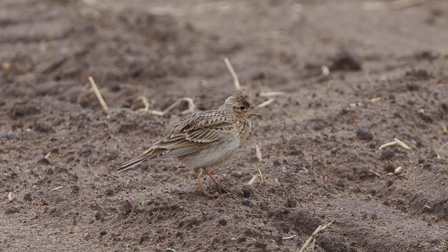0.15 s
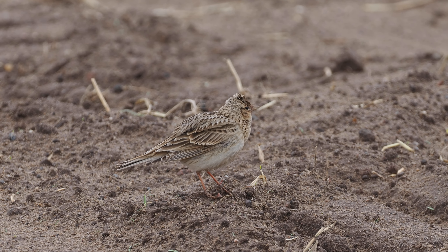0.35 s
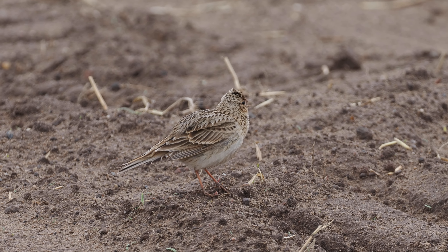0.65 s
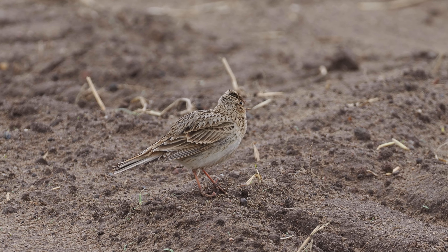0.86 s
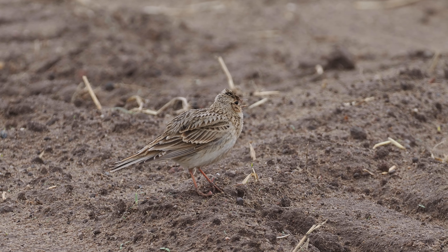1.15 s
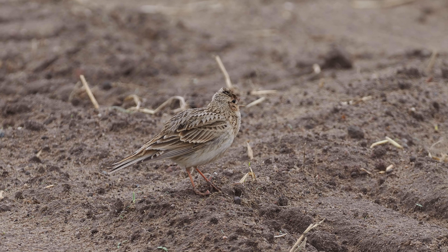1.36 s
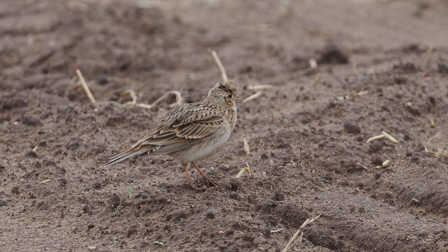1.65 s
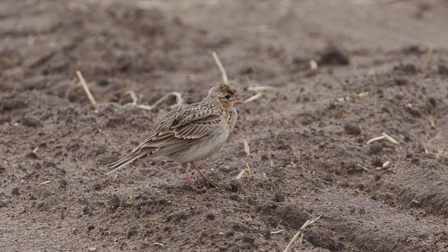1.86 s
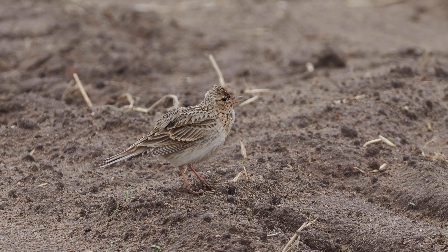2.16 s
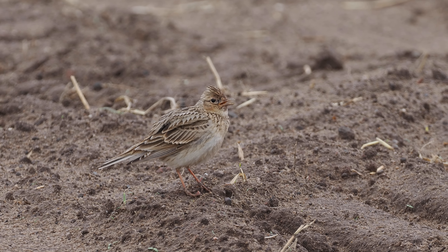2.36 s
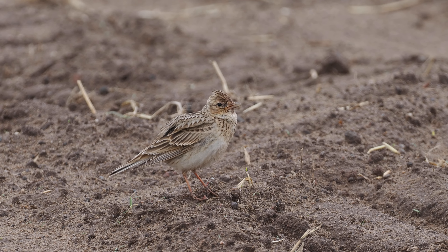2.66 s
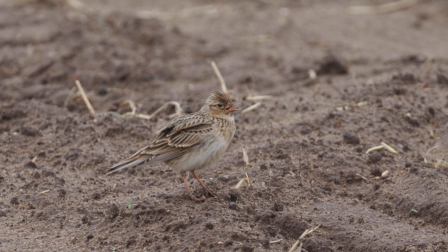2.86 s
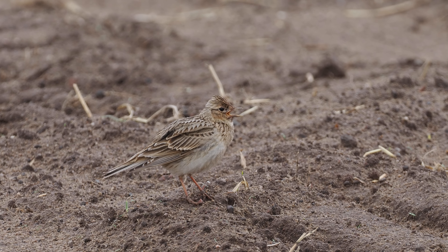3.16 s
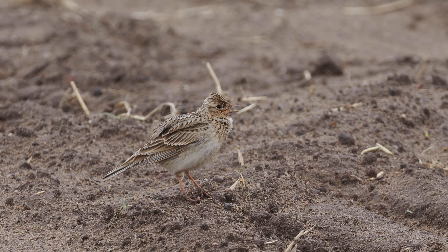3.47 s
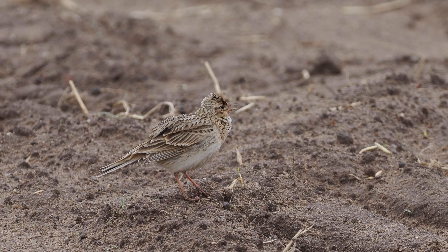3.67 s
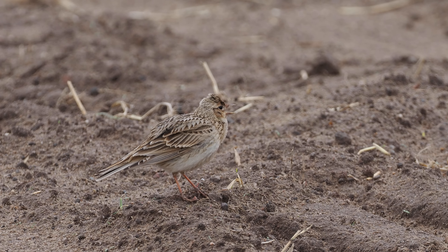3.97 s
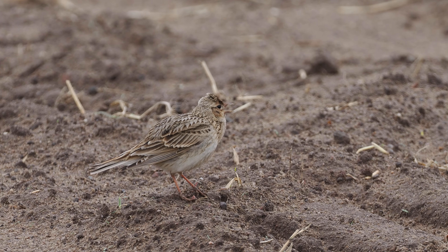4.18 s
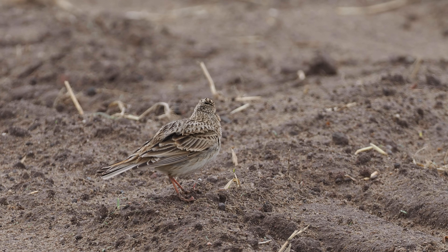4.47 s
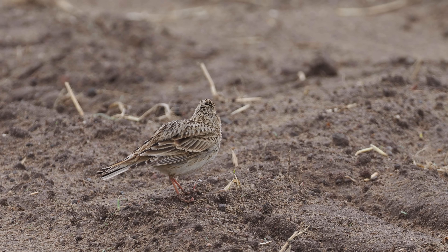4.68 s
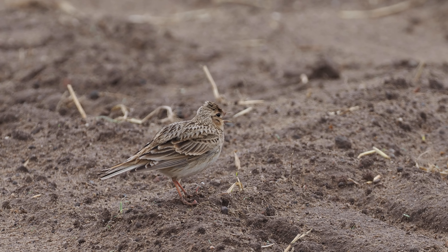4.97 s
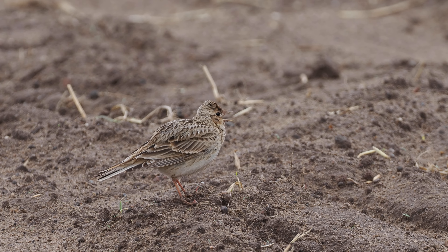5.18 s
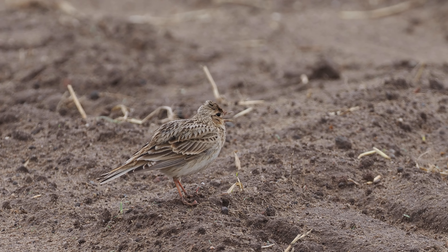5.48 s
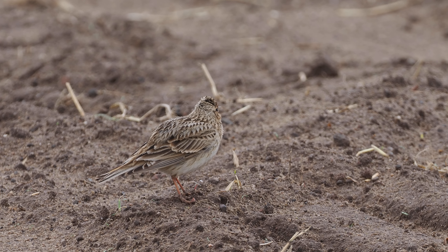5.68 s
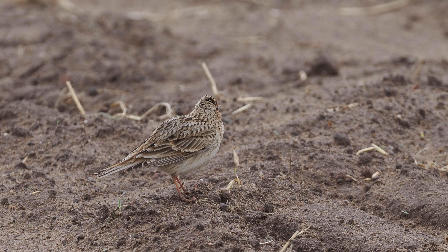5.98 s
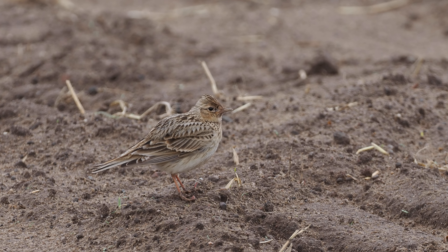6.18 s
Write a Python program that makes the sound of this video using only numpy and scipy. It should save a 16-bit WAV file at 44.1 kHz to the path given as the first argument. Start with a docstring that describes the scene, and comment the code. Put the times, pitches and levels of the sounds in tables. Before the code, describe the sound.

A skylark sings a fast run of trills, whistles and buzzes close by, with gusty wind rumbling on the microphone.

```python
"""A skylark close by opens with a falling whistle, sweeps, a rattle and a stutter. Twitters, creaking
chews and buzzes follow, then slurs, trills, a wobble and rising whistles; a run of pips ends the song.
Each syllable is a gliding tone of the syrinx, most of them frequency-modulated by a repeated gesture,
and filtered by throat and beak. Throughout, bare soil scatters the song, and wind rumbles and buffets
the microphone over the far hum of open country."""
import sys
import numpy as np
from scipy import signal
from scipy.fft import rfft, irfft, next_fast_len
from scipy.io import wavfile
from scipy.ndimage import uniform_filter1d

SR = 44100
rng = np.random.default_rng(int(sys.argv[2]) if len(sys.argv) > 2 else 0)


def log_audio(samples):
    """Write samples as a 16-bit WAV file to the path given in sys.argv[1]."""
    # one column per channel
    frames = np.atleast_2d(samples).T
    # limit to full scale, then quantise
    limited = np.clip(frames, -1, 1)
    pcm = np.round(limited * 32767).astype(np.int16)
    wavfile.write(sys.argv[1], SR, pcm)


N = 279148


def skylark():
    """Superposition: the song is the sum of its syllables, each delayed to its onset."""
    song = [(0, falling_whistle()), (.464, sweeps()), (.7188, rattle()), (.844, stutter())]
    for syllable, rows in [(chew, CHEWS), (buzz, BUZZES), (twitter, TWITTERS),
                           (tick, TICKS), (tsip, TSIPS), (pip, PIPS)]:
        song += [(s, syllable(*row)) for s, *row in rows]
    for s, slur_s, trill_s, slur_db, trill_hz, trill_db in SLURS:
        song += [(s, slur(slur_s, slur_db)), (s + slur_s, trill(trill_s, trill_hz, trill_db))]
    song += [(s, pip(hz, 0, db, length=.014)) for s, hz, db in LEAD_NOTES]
    song += [(4.249, wobble())]
    song += [(rows[0][0], rising_whistle(rows)) for rows in (LOW_WHISTLE, HIGH_WHISTLE)]
    out = np.zeros(N)
    for s, sound in song:
        add(out, s, sound)
    return out


# Response of throat and beak: (frequency [Hz], gain [dB])
THROAT = [(1800, -12), (3000, -4), (3700, -8), (4300, -3.5), (4800, -2), (5400, 0.5), (6000, -15),
          (6600, -12.5), (7800, 0), (8500, -24), (15000, -17.5)]


def voice(hz, effort_db, jitter, second_db, nasal_db=-46, air_db=-50, third_db=-25, upper_db=-6):
    """Source and filter: the throat shapes tone and breath, turning pitch swings into throbs of level."""
    hz = hz * (1 + jitter * drift(len(hz), 640))
    phase = 2 * np.pi * np.cumsum(hz) / SR
    partials = [(1, 0), (2, second_db), (3, third_db)]
    # a nasal note also vibrates at half the pitch, filling the gaps between harmonics
    partials += [(.5, nasal_db), (1.5, nasal_db + upper_db), (2.5, nasal_db + upper_db)]
    tone = sum(amp(db) * (k * hz < SR / 2) * np.sin(k * phase) for k, db in partials)
    breath = signal.lfilter(*signal.butter(2, 5000, "high", fs=SR), rng.standard_normal(len(hz)))
    fade = signal.windows.tukey(len(hz), min(.004 * SR / len(hz), 1))
    source = np.sqrt(2) * (tone + amp(air_db) * breath) * fade * amp(effort_db)
    source = np.pad(source, (0, SR // 50))
    size = next_fast_len(2 * len(source))
    throat = amp(spectrum_at(THROAT, np.fft.rfftfreq(size, 1 / SR)))
    return irfft(rfft(source, size) * throat, size)[:len(source)]


def warble(gesture, hz, effort_db, swing_hz, rate_hz, air_db=-28, rasp_hz=180, second_db=-20,
           grain_db=4, clean_hz=4300, uneven=.034, throb=1, jitter=.014):
    """Frequency and amplitude modulation: a gesture of the syrinx repeats, never twice quite alike."""
    cycles = np.cumsum(rate_hz * (1 + uneven * drift(len(hz), 150))) / SR
    phase, *columns = np.transpose(gesture)
    bend, pulse_db = (uniform_filter1d(np.interp(cycles, phase, c, period=1), size=24) for c in columns)
    hz = hz + swing_hz * bend
    # at low pitch the slack membrane flutters: the tone rasps and loses its overtone
    slack = np.clip((clean_hz - hz) / 1000, 0, 1)
    hz = hz + slack * rasp_hz * drift(len(hz), 1110)
    pulse_db = throb * pulse_db + slack * grain_db * np.tanh(drift(len(hz), 670))
    return voice(hz, effort_db + pulse_db, jitter, second_db - 7 * slack ** 2, air_db=air_db)


def whistle(hz, effort_db, second_db=-25):
    """Nearly sinusoidal vibration gives a clean tone."""
    return voice(hz, effort_db, jitter=.002, second_db=second_db)


def falling_whistle(length=.34, sag_hz_per_s=2050, db=-20, fade_db_per_s=58):
    """Exponential decay: the note dies away as its pitch eases off the top and sags."""
    t, u = clock(length)
    hz = shift(t, 4990, 4480, at_s=.052, over_s=.043) - sag_hz_per_s * t
    return whistle(hz, db - fade_db_per_s * t + release(t))


# Downsweep gesture: (phase [cycles], bend [swings], level [dB])
SWEEP = [(0, 1.1, -12), (.13, .7, 1), (.42, 0, 0), (.65, -.4, -7), (.88, -1.3, -20)]


def sweeps(length=.22, hz=5230, sink_hz=600, swing_hz=1300, narrow_hz=660, db=-25):
    """Sawtooth modulation: steep downsweeps settle in pace while they sink, narrow and swell."""
    t, u = clock(length)
    effort_db = db + swell(u, crest=.75, rise_db=10, fade_db=7.5)
    rate_hz = 43.3 + 15 * np.exp(-t / .035)
    return warble(SWEEP, hz - sink_hz * u, effort_db, swing_hz - narrow_hz * u, rate_hz,
                  air_db=-19, second_db=-14)


# Flick gesture: (phase [cycles], bend [swings], level [dB])
FLICK = [(0, 1, -12), (.1, .3, 0), (.24, -.8, -3), (.6, -1, -4), (.88, -1, -22)]


def rattle(length=.076, hz=4550, swing_hz=1300, rate_hz=79, db=-31):
    """Wide modulation of a steady carrier is heard as dry flicks."""
    t, u = clock(length)
    effort_db = db + swell(u, crest=.82, rise_db=5, fade_db=5)
    return warble(FLICK, np.full_like(t, hz), effort_db, swing_hz, rate_hz, air_db=-11)


# Notch gesture: (phase [cycles], bend [swings], level [dB])
NOTCH = [(0, -.9, -24), (.09, .7, 0), (.24, .2, 1), (.76, -.1, 0), (.92, -1, -6)]


def stutter(length=.22, db=-25.5, swing_hz=560, narrow_hz=420, sag_hz_per_s=1350, fade_db_per_s=85):
    """Waning modulation: the notches in a falling whistle halve in rate and smooth out."""
    t, u = clock(length)
    hz = shift(t, 6000, 4360, at_s=.077, over_s=.05) - sag_hz_per_s * t
    rate_hz = shift(t, 117, 58, at_s=.047, over_s=.012)
    effort_db = db + swell(u, crest=.33, rise_db=3, fade_db=-1.5) + release(t)
    effort_db -= fade_db_per_s * np.maximum(t - .085, 0)
    return warble(NOTCH, hz, effort_db, swing_hz - narrow_hz * u, rate_hz,
                  rasp_hz=40, throb=1 - u ** 3, jitter=.005)


# Notes of a twitter: (nominal onset [s], duration [s], nominal pitch [Hz], scoop [Hz], effort [dB])
NASAL_NOTES = [(0, 0.0067, 5410, 1519, -27.5), (.01, 0.0074, 7340, 2509, -27.5),
               (0.019, 0.0081, 6880, 2504, -32), (0.028, 0.018, 6570, 1691, -36),
               (.045, .015, 5800, 900, -29.5), (.063, 0.019, 4990, 300, -27.5),
               (0.086, 0.015, 4310, 0, -33)]
# Twitters: (time [s], onset spacing [ratio], pitch [ratio], added effort [dB])
TWITTERS = [(1.107, 0.94, 1.054, -4), (3.076, 0.94, 1.014, 0.5), (3.207, 0.99, 0.975, 2),
            (3.342, 0.9, 1.03, 2)]


def twitter(stretch, pitch, effort_db, scoop_s=.0025, sag=.055, break_hz=5300, break_db_per_hz=.0025):
    """Period doubling: quick notes scoop up and sag, the highest breaking most into the octave below."""
    out = np.zeros(SR // 2)
    for s, length, hz, scoop_hz, db in NASAL_NOTES:
        t, u = clock(length)
        glide = pitch * hz * (1 - sag * u ** 2) - scoop_hz * np.exp(-(t / scoop_s) ** 2)
        breaking_db = break_db_per_hz * max(hz - break_hz, 0)
        note_db = db + effort_db - breaking_db / 2 + swell(u, crest=.35, rise_db=4, fade_db=11)
        note = voice(glide, note_db, jitter=.022, second_db=-21, nasal_db=breaking_db - 7.5,
                     air_db=-20, upper_db=-11)
        add(out, s * stretch, note)
    return out


# Gestures of a chew's head and tail: (phase [cycles], bend [swings], level [dB])
HOOK = [(0, -1, -22), (.17, -.2, -1), (.37, .15, 2), (.56, .3, -20), (.72, .8, -11), (.86, -.1, -7)]
CREAK = [(0, .7, -5), (.07, .1, 4), (.18, -.6, -3), (.3, -1.1, -8), (.43, -.45, 4), (.54, .2, 2),
         (.66, .6, -7), (.86, .7, -22)]
# Chews: (time [s], duration [s], head effort [dB], tail effort [dB], final pitch [Hz])
CHEWS = [(1.246, 0.12, -29.5, -36, 2910), (1.397, 0.12, -29.5, -33, 2716), (1.558, 0.13, -27, -32.5, 2686),
         (1.719, 0.12, -24.5, -31, 2760), (1.887, 0.14, -20, -31, 2574), (2.07, 0.14, -25.5, -31.5, 2676),
         (2.767, .11, -13.5, -31.5, 2630), (2.913, 0.13, -18.5, -32, 2710), (3.478, 0.13, -20, -30, 2670),
         (3.64, 0.12, -21.5, -31.5, 2694)]


def chew(length, head_db, tail_db, end_hz, head_s=.032, head_hz=4400, drop_hz=1450, sag_hz=220):
    """Exponential relaxation: after three high hooks, pitch and pace drop into a creaking tail."""
    out = np.zeros(SR // 4)
    t, u = clock(head_s)
    effort_db = head_db + swell(u, crest=.6, rise_db=8, fade_db=4)
    add(out, 0, warble(HOOK, np.full_like(t, head_hz), effort_db, swing_hz=680, rate_hz=88))
    t, u = clock(length - head_s)
    dropping = np.exp(-t / .015)
    hz = end_hz + sag_hz * (1 - u) + drop_hz * dropping
    carried_db = .27 * (head_db - tail_db) * dropping
    effort_db = tail_db + carried_db + swell(u, crest=.65, rise_db=2, fade_db=4)
    add(out, head_s, warble(CREAK, hz, effort_db, swing_hz=580, rate_hz=53 + 14 * dropping))
    return out


# Flutter gesture of buzz and slur: (phase [cycles], bend [swings], level [dB])
FLUTTER = [(0, -1.25, -6), (.22, .5, -7), (.48, .9, 0), (.76, .3, 4)]
# Buzzes: (time [s], top pitch [Hz], effort [dB]) with the duration [s] after the time
BUZZES = [(2.245, 0.12, 4920, -17.5), (2.4177, 0.13, 4917, -17.5), (2.591, 0.1277, 4900, -16.5)]


def buzz(length, top_hz, db, end_hz=2270, scoop_hz=330, rate_hz=305, slowing_hz=85, soften_db=12.5):
    """Sidebands of fast modulation make a hoarse note; it slides down an octave, slowing and softening."""
    t, u = clock(length)
    hz = shift(t, top_hz, end_hz, at_s=.066, over_s=.036) - scoop_hz * np.exp(-t / .0087)
    effort_db = db + swell(u, crest=.16, rise_db=16, fade_db=3)
    effort_db -= shift(t, 0, soften_db, at_s=.063, over_s=.013)
    swing_hz = shift(t, 470, 260, at_s=.0832, over_s=.029)
    return warble(FLUTTER, hz, effort_db, swing_hz, rate_hz - slowing_hz * u ** 1.5)


# Slurs running into trills: (time [s], slur duration [s], trill duration [s], slur effort [dB],
# trill pitch [Hz], trill effort [dB])
SLURS = [(3.822, 0.041, 0.061, -20.5, 4695, -23), (4.837, 0.082, 0.062, -20, 4440, -30),
         (5.157, 0.072, 0.07, -17, 4630, -25.5)]


def slur(length, db, top_hz=6400, end_hz=3350, sag_hz=400, swing_hz=260, rate_hz=200):
    """Irregular modulation: a high note quivers, then steadies as it plunges."""
    t, u = clock(length)
    hz = shift(t, top_hz, end_hz, at_s=.86 * length, over_s=.14 * length) - sag_hz * u
    quiver = shift(t, 1, 0, at_s=.6 * length, over_s=.12 * length)
    effort_db = db + swell(u, crest=.74, rise_db=15, fade_db=36.5)
    return warble(FLUTTER, hz, effort_db, swing_hz * quiver, rate_hz, uneven=.15, throb=quiver)


# Zigzag gesture: (phase [cycles], bend [swings], level [dB])
ZIGZAG = [(.03, -.92, -5), (.16, -.85, -7), (.3, .05, 2), (.5, 1.05, -8), (.62, .6, -1), (.72, -.05, 2),
          (.87, -.85, -6)]


def trill(length, hz, db, swing_hz=1260, rate_hz=90):
    """Triangular modulation: the level peaks twice a cycle, as the pitch rises and as it falls."""
    t, u = clock(length)
    effort_db = db + swell(u, crest=.58, rise_db=5, fade_db=16)
    return warble(ZIGZAG, np.full_like(t, hz), effort_db, swing_hz, rate_hz, air_db=-15)


# Two runs of pips: (time [s], pitch [Hz], sag [Hz], effort [dB])
PIPS = [(3.951, 4836, 560, -19.5), (3.997, 4856, 200, -21.5), (4.042, 4820, 232, -20),
        (4.086, 4800, 172, -21.5), (4.129, 4740, 129, -23.5), (5.333, 4690, 423, -31),
        (5.376, 4736, 290, -26), (5.42, 4720, 160, -24), (5.465, 4766, 110, -23.5),
        (5.512, 4802, 120, -22.5), (5.558, 4690, 190, -28), (5.604, 4610, 170, -32.5)]
# Two short pips before the wobble: (time [s], pitch [Hz], effort [dB])
LEAD_NOTES = [(4.223, 4580, -27), (4.238, 3220, -27.5)]


def pip(hz, sag_hz, db, length=.036, arch_hz=620, roundness=.77, cut_s_per_hz=1.2e-5):
    """A rounded tone burst of arching pitch; the more it sags, the sooner it ends."""
    t, u = clock(length - cut_s_per_hz * sag_hz)
    effort_db = db + roundness * 20 * np.log10(np.sin(np.pi * u) + 1e-3)
    return whistle(hz + sag_hz * (.5 - u) - arch_hz * (.5 - u) ** 2, effort_db, second_db=-15)


# Gesture of an arch and a low scoop: (phase [cycles], bend [swings], level [dB])
LOOP = [(0, -.6, -6), (.12, .3, 1), (.28, .95, -4), (.38, .7, -1), (.46, -.2, 4), (.54, -1.3, -22),
        (.65, -.8, 0), (.78, -.55, 2), (.92, -.7, -5)]


def wobble(length=.22, end_hz=3130, excess_hz=560, relax_s=.11, db=-36, push_db=3):
    """Relaxing tension: slow arches lose pitch, width, pace and effort together."""
    t, u = clock(length)
    tension = np.exp(-t / relax_s)
    hz = end_hz + excess_hz * tension
    effort_db = db + push_db * tension + release(t)
    swing_hz = 540 + 300 * tension
    rate_hz = shift(t, 40, 37, at_s=.04, over_s=.02)
    return warble(LOOP, hz, effort_db, swing_hz, rate_hz, rasp_hz=170, second_db=-15)


# Ticks: (time [s], duration [s], initial pitch [Hz], final pitch [Hz], effort [dB])
TICKS = [(4.519, 0.0065, 4900, 5830, -28.5), (4.592, 0.0062, 4940, 6200, -21.5),
         (4.609, 0.0041, 4970, 6460, -12), (5.021, 0.0052, 6780, 3830, -24.5),
         (5.035, 0.005, 6640, 4440, -18.5)]


def tick(length, from_hz, to_hz, db):
    """A linear chirp: one flick of the syrinx, brief enough to sound like a click."""
    t, u = clock(length)
    return voice(from_hz + (to_hz - from_hz) * u, db, jitter=.0045, second_db=-17, air_db=-14)


# Snap gesture: (phase [cycles], bend [swings], level [dB])
SNAP = [(0, 1, -11), (.2, -.1, -5), (.4, -1, -13), (.6, -.2, 0), (.84, .6, -2)]
# Tsips: (time [s], duration [s], effort [dB])
TSIPS = [(4.538, 0.0203, -16), (4.6123, 0.022, -17.5)]


def tsip(length, db, hz=5100, swing_hz=1200):
    """Slowing modulation: the pitch snaps down and springs back twice, lingering the second time."""
    t, u = clock(length)
    rate_hz = shift(t, 105, 40, at_s=.016, over_s=.002)
    effort_db = db + swell(u, crest=.38, rise_db=22, fade_db=5.5)
    return warble(SNAP, np.full_like(t, hz), effort_db, swing_hz, rate_hz, air_db=-21, second_db=-13.5)


# Whistle contours: (time [s], pitch [Hz], effort [dB])
LOW_WHISTLE = [(4.665, 2990, -54), (4.679, 3040, -43), (4.693, 3150, -48.5), (4.713, 3180, -31),
               (4.754, 3900, -39.5), (4.772, 4325, -22.5), (4.786, 4260, -28), (4.8, 3250, -38)]
HIGH_WHISTLE = [(5.037, 4600, -41), (5.045, 5574, -21), (5.08, 5520, -25), (5.111, 6120, -17),
                (5.124, 6150, -39.5)]


def rising_whistle(contour):
    """Glissando: a clean tone follows a smoothed pitch contour."""
    s, hz, db = np.transpose(contour)
    t = np.arange(s[0], s[-1], 1 / SR)
    glide = uniform_filter1d(np.interp(t, s, hz), size=300, mode="nearest")
    return whistle(glide, np.interp(t, s, db))


def scatter(x, t60, delay_s, level_db):
    """Diffuse reflection: clods and furrows return faint echoes, partly different at each port."""
    t = np.arange(SR // 2) / SR
    taps = rng.standard_normal((2, len(t))) * (rng.random((2, len(t))) < .1) * (t > delay_s)
    taps = (taps + taps.mean(0)) * 1000 ** (-t / t60)
    taps /= np.linalg.norm(taps, axis=1, keepdims=True)
    return amp(level_db) * signal.fftconvolve(x[None], taps, axes=1)[:, :N]


# Gusts: (peak time [s], half-width [s], level [dB], cutoff [Hz], microphone port)
GUSTS = [(0.082, 0.25, -22.5, 250, "right"), (0.502, 0.024, -22.5, 154, "right"),
         (0.639, 0.029, -19, 463, "right"), (2.183, 0.041, -19.5, 235, "right"),
         (3.509, 0.11, -30.5, 172, "right"), (3.879, 0.085, -25.5, 162, "right"),
         (3.921, 0.037, -22, 117, "left"), (4.42, 0.12, -30.5, 188, "right"),
         (4.612, 0.09, -22, 184, "right"), (5.285, 0.12, -24.5, 213, "right"),
         (5.992, 0.23, -30.5, 189, "right")]


def gusts(order=3.03, low_hz=35, lumpy_db=7.5):
    """Turbulence: each eddy strikes one port as a lumpy burst of low noise."""
    t, hz = np.arange(SR) / SR - .5, np.fft.rfftfreq(SR, 1 / SR)
    ports = {"left": np.zeros(N + SR), "right": np.zeros(N + SR)}
    for s, width_s, db, cutoff_hz, port in GUSTS:
        colour = hz / (hz ** 2 + low_hz ** 2) ** .94 / np.sqrt(1 + (hz / cutoff_hz) ** (2 * order))
        envelope = np.exp(-2 * (t / width_s) ** 2)
        noise = irfft(rfft(rng.standard_normal(SR)) * colour, SR)
        eddy = noise * envelope * amp(lumpy_db * drift(SR, 40))
        add(ports[port], s, amp(db) * unit_rms(eddy) * np.sqrt(np.mean(envelope ** 2)))
    return np.array(list(ports.values()))[:, SR // 2:][:, :N]


# Spectra of wind rumble and far country: (frequency [Hz], relative level [dB])
RUMBLE = [(16, -21), (44, 0.5), (68, -1.5), (82, -6), (185, -24.5), (500, -31), (680, -68.5)]
COUNTRY = [(260, -36.5), (480, -12.5), (1040, -4.5), (1330, -10.5), (1640, -12.5), (4520, -30), (8580, -32),
           (15800, -36.5)]
# Likeness of the noise at the two ports: (frequency [Hz], coherence [0-1])
COHERENCE = [(400, 0.82), (1500, 0.78), (8000, 0.1)]


def noise_bed(spectrum, level_db, swell_db, swell_hz, lag_s=0):
    """Partial coherence: swelling noise, more alike at the two ports in the bass than in the treble."""
    hz = np.fft.rfftfreq(N, 1 / SR)
    left, independent = rfft(rng.standard_normal((2, N)))
    coherence = spectrum_at(COHERENCE, hz)
    delay = np.exp(-2j * np.pi * hz * lag_s)  # sound from the left reaches the right port later
    right = coherence * delay * left + np.sqrt(1 - coherence ** 2) * independent
    pair = irfft(np.array([left, right]) * amp(spectrum_at(spectrum, hz)), N)
    return unit_rms(pair * amp(swell_db * drift(N, swell_hz))) * amp(level_db)


def clock(length):
    """Time t in seconds through a syllable, and the fraction u elapsed."""
    t = np.arange(0, length, 1 / SR)
    return t, t / length


def shift(t, before, after, at_s, over_s):
    """A sigmoid transition between two settings of the syrinx."""
    return before + (after - before) * (1 + np.tanh((t - at_s) / over_s)) / 2


def swell(u, crest, rise_db, fade_db):
    """An envelope in dB: two parabolas meeting at 0 where u equals crest."""
    rise = rise_db * (1 - u / crest) ** 2
    fade = fade_db * ((u - crest) / (1 - crest)) ** 2
    return -np.where(u < crest, rise, fade)


def release(t, over_s=.0096, depth_db=16):
    """The fall in dB as the air runs out at the end of a note."""
    return -depth_db * np.exp((t - t[-1]) / over_s)


def drift(count, hz):
    """Random fluctuation of rms 1, low-passed at about hz."""
    size = next_fast_len(count + 4096)
    lowpass = np.exp(-(np.fft.rfftfreq(size, 1 / SR) / hz) ** 2)
    return unit_rms(irfft(rfft(rng.standard_normal(size)) * lowpass, size))[:count]


def amp(db):
    """Decibels to amplitude ratio."""
    return 10 ** (np.asarray(db) / 20)


def unit_rms(x):
    """Normalisation to unit power."""
    return x / np.sqrt(np.mean(x ** 2) + 1e-20)


def spectrum_at(points, hz):
    """Interpolation on a log-frequency axis."""
    f, value = np.transpose(points)
    return np.interp(np.log(np.abs(hz) + 1), np.log(f + 1), value)


def add(mix, s, sound):
    """Superposes a sound on the mix at s seconds."""
    part = mix[max(round(s * SR), 0):][:len(sound)]
    part += sound[:len(part)]


def scene():
    """Superposition of direct song from ahead, its reflections, the far country and the wind."""
    bird = skylark()
    direct = np.array([amp(.5) * np.roll(bird, shift=1), amp(-.5) * bird])
    soil = scatter(bird, t60=.07, delay_s=.002, level_db=-18)
    ridge = scatter(bird, t60=.03, delay_s=.011, level_db=-21)
    field = scatter(bird, t60=.32, delay_s=.02, level_db=-31)
    country = noise_bed(COUNTRY, level_db=-50.5, swell_db=-.02, swell_hz=7.9, lag_s=.00012)
    rumble = noise_bed(RUMBLE, level_db=-39.5, swell_db=2, swell_hz=8.3)
    return direct + soil + ridge + field + country + rumble + gusts()


def record(dry):
    """Band limiting: a linear-phase low-pass filter removes the highest treble."""
    lowpass = signal.firwin(511, cutoff=15900, window=("kaiser", 9), fs=SR)
    return signal.oaconvolve(dry, lowpass[None], "same")


dry = scene()
out = record(dry)
log_audio(out)
```